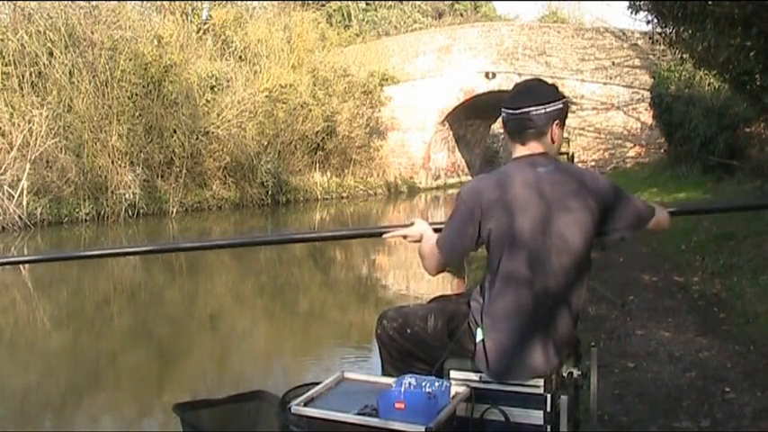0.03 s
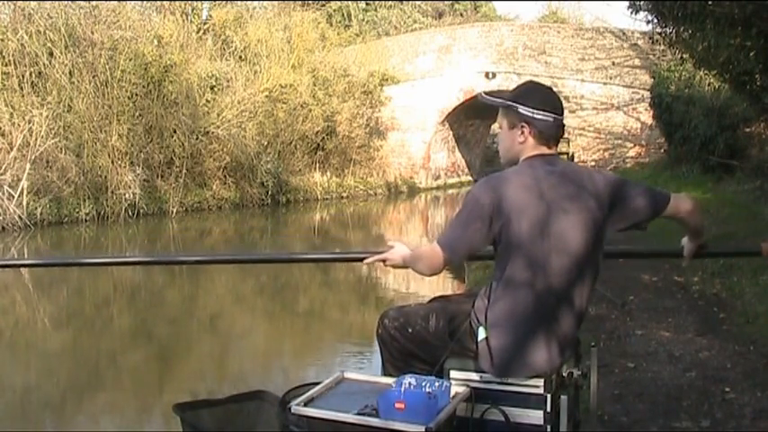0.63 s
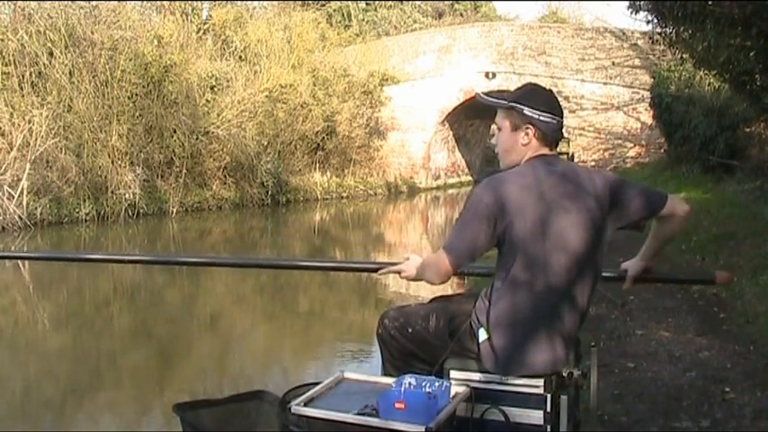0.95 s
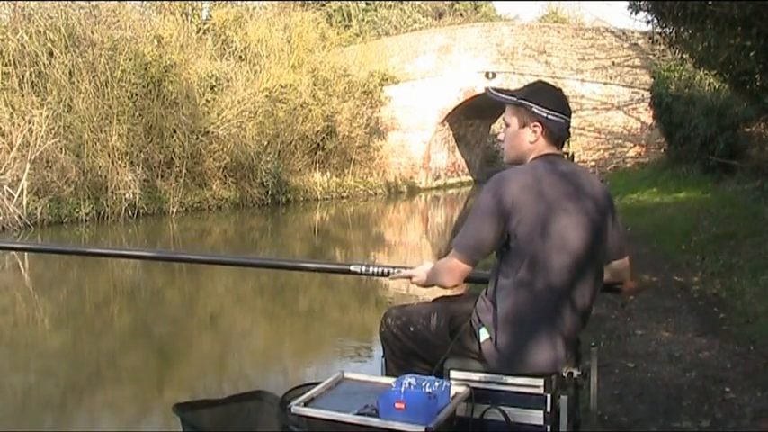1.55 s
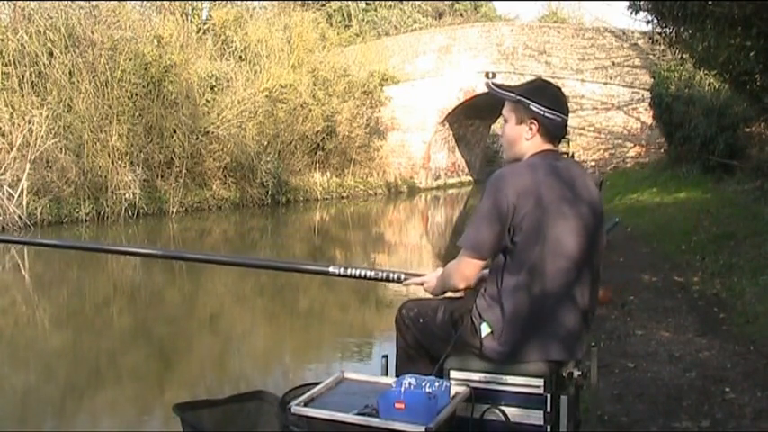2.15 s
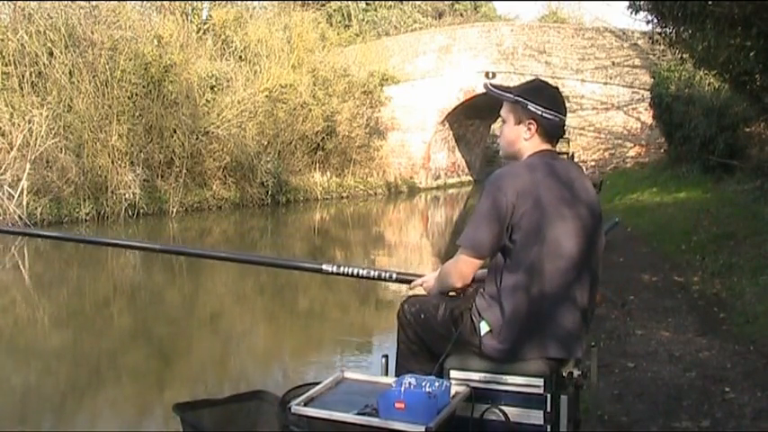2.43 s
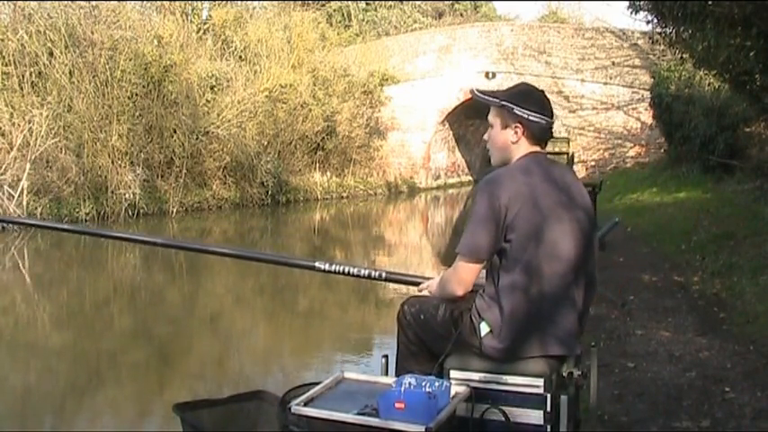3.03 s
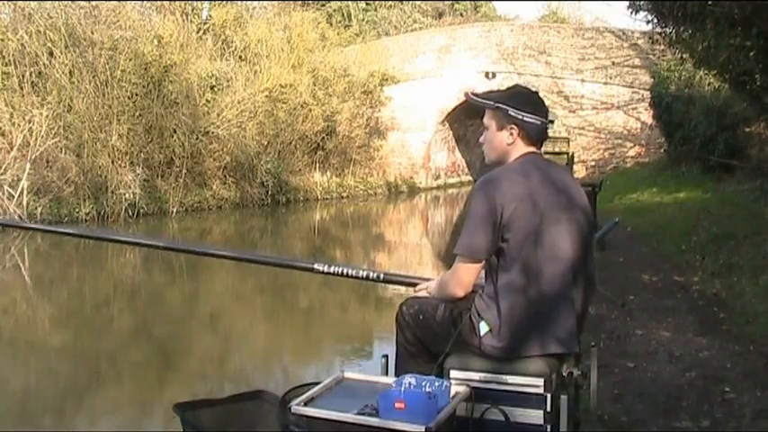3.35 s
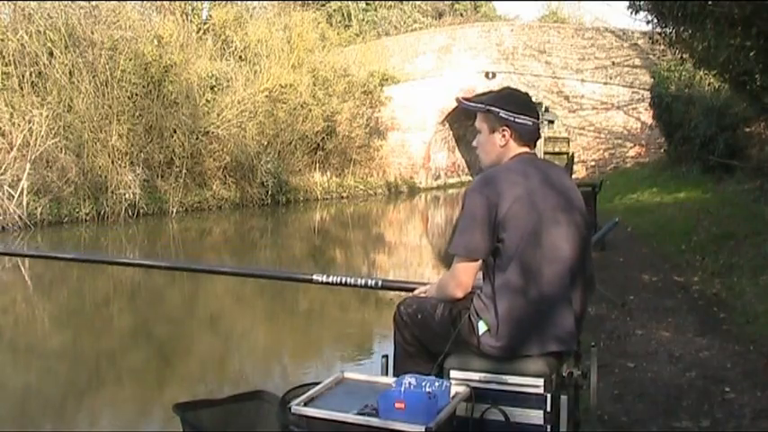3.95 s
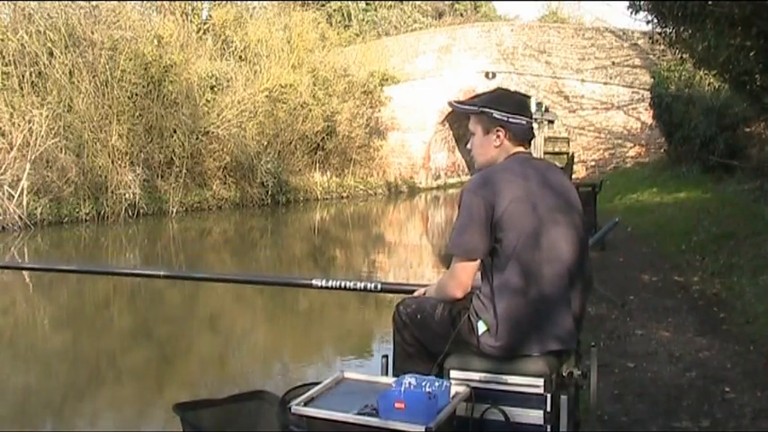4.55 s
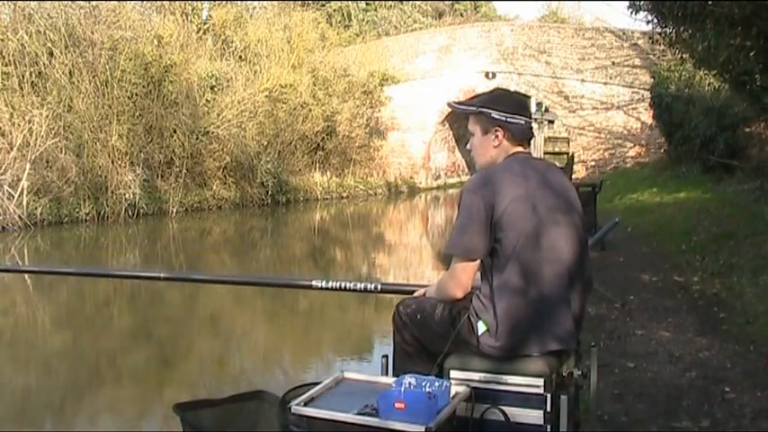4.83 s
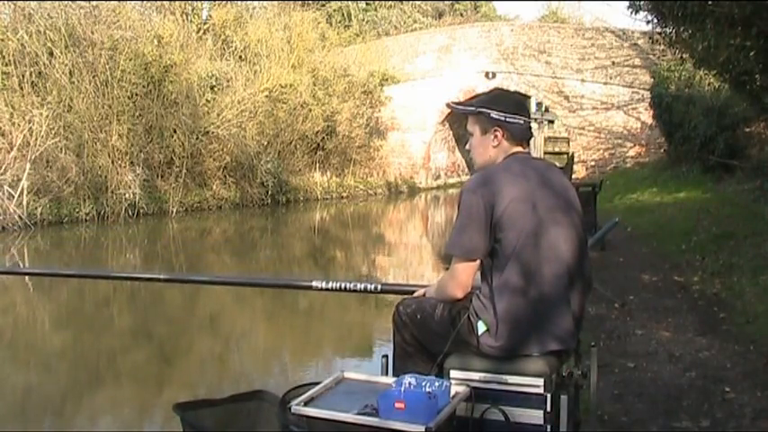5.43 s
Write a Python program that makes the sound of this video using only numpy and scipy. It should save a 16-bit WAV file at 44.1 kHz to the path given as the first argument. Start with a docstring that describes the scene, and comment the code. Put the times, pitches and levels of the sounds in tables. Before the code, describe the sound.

On a quiet canal bank, skin rubs along a hollow fishing pole near the microphone, making a bright, dry hiss in overlapping pulls with some gentle bumps. As the strokes fade, short whistles and chirps from a small bird come through with a slight echo. A few little bubbles plop and tackle clicks faintly. A far engine hums throughout under a light breeze, which swells briefly near the end.

```python
"""A few hissing strokes, then near quiet: an angler on a canal bank slides a long carbon pole back
through his hands and sits still. Skin friction makes the hiss and rings the hollow tube.
The pole knocks softly, tackle ticks, bubbles plop; a small songbird whistles in the bushes,
echoed by the bank. A far engine hums under the low rumble of the open air."""
import sys
import numpy as np
from scipy import signal
from scipy.fft import rfft, irfft
from scipy.io import wavfile
from scipy.ndimage import uniform_filter1d, map_coordinates

SR = 44100
rng = np.random.default_rng(int(sys.argv[2]) if len(sys.argv) > 2 else 0)


def unload_wav(signal):
    """Save mono or channel-first audio to the path in sys.argv[1] as 16-bit WAV at rate SR, clipped to [-1, 1]."""
    wavfile.write(
        sys.argv[1],
        SR,
        np.round(np.clip(np.atleast_2d(signal).T, -1, 1) * 32767).astype(np.int16),
    )


N = 251370
T = np.arange(N) / SR
BIN_HZ = np.arange(N // 2 + 1) * SR / N
AIR_LEFT_DB = 3.5

# friction spectra of the grips, shared by the strokes: f/Hz, level/dB
FAST_PULL = [(500, -34), (850, -29), (1060, -24), (1370, -19), (1870, -21), (2010, -19.5), (2170, -22.5),
             (2570, -21), (3440, -17), (6390, -11), (9310, 3), (11200, -1), (13200, -8), (14800, -9.5),
             (15500, -12)]
REACH = [(650, -45), (1100, -17.5), (1300, -26.5), (1500, -17), (1750, -23.5), (3220, -12.5), (4150, -15),
         (9520, 8), (11100, 7), (12300, -1.5), (13400, -0.5), (15500, -8)]
LONG_PULL = [(650, -47.5), (1100, -19), (1690, -17.5), (2090, -14.5), (2850, -13), (4340, -14.5),
             (5180, -11), (7140, -4.5), (8720, 2), (10800, 1.5), (11600, -6), (13400, -6), (15500, -15.5)]
SLOW_PULL = [(650, -19), (1100, 4), (1390, -13), (1530, 3), (1710, 4), (1960, 2.5), (2500, 2), (2980, 0.5),
             (3480, 0), (4150, -7), (5920, -6), (7220, -6), (8810, -3), (10600, -5), (15500, -18)]
LAST_PULL = [(590, -29), (1000, -4), (1080, -4), (1330, -9), (1460, -2.5), (2010, 1.5), (2340, -3.5),
             (3010, -8.5), (3410, -6), (3700, -11), (4340, -7.5), (5720, -10), (9040, 3), (12000, -4),
             (15500, -12)]


def undb(db):
    """Decibels to gain."""
    return 10 ** (np.asarray(db) / 20)


def unit(x):
    """Scale to rms 1."""
    return x / np.sqrt(np.mean(x ** 2) + 1e-20)


def curves(table):
    """Table columns, linearly interpolated in time."""
    times_s, *columns = np.transpose(table)
    return [np.interp(T, times_s, column) for column in columns]


def pan(left_db):
    """Stereo gains for a left-minus-right level."""
    return undb(np.array([[0.5], [-0.5]]) * left_db)


def butter(x, hz, kind, order=2):
    """Butterworth filter."""
    sos = signal.butter(order, hz, kind, fs=SR, output="sos")
    denormal_guard = 1e-12 * np.sin(np.arange(np.shape(x)[-1]))
    return signal.sosfilt(sos, x + denormal_guard)


def colour(x, points):
    """Filter by (f/Hz, gain/dB) points."""
    hz, db = np.transpose(points)
    return irfft(rfft(x) * undb(np.interp(np.log(BIN_HZ + 1), np.log(hz), db)), N)


def spread(mid, side, wide_hz):
    """Stereo pair: alike in the bass, unrelated above wide_hz."""
    side = irfft(rfft(side) * np.sqrt(BIN_HZ / (BIN_HZ + wide_hz)), N)
    return np.array([mid + side, mid - side])


def walk(rate_hz):
    """Smoothed random steps, rms 1."""
    hold = int(SR / rate_hz)
    steps = np.repeat(rng.standard_normal(N // hold + 1), hold)
    return unit(uniform_filter1d(uniform_filter1d(steps, hold), hold)[:N])


def add(out, x, start_s):
    """Mix x into out at start_s."""
    i = int(start_s * SR)
    out[i:i + len(x)] += x[:N - i]


def ramps(t, length_s, attack_s, release_s):
    """Trapezoid envelope."""
    return np.clip(np.minimum(t / attack_s, (length_s - t) / release_s), 0, 1)


def decay(t, t60_s):
    """Exponential fall, 60 dB per t60_s."""
    return np.exp(-np.log(1000) * t / t60_s)


def glide(length_s, first_hz, last_hz, arch_hz=0):
    """Linear pitch sweep plus a parabolic arch."""
    u = np.linspace(0, 1, int(length_s * SR))
    return first_hz + (last_hz - first_hz) * u + arch_hz * (1 - (2 * u - 1) ** 2)


def tone(hz, fade_s, waver):
    """Sine along a pitch curve, with jitter and soft ends."""
    t = np.arange(len(hz)) / SR
    jitter = np.interp(t, T[::64], rng.standard_normal(len(T[::64])))
    fade = np.sin(ramps(t, t[-1], fade_s, fade_s) * np.pi / 2) ** 2
    return np.sqrt(2) * fade * np.sin(2 * np.pi * np.cumsum(hz * (1 + waver * jitter)) / SR)


def delay(x, lag_s):
    """Time-varying delay."""
    return map_coordinates(x, [np.arange(N) - lag_s * SR], order=3, mode="nearest")


def bank_echoes(x, t60_s, build_s):
    """Diffuse echoes off bushes, bank and bridge, different at each ear."""
    t = T[:SR]
    response = rng.standard_normal((2, SR)) * (1 - np.exp(-t / build_s)) * decay(t, t60_s)
    response /= np.sqrt(np.sum(response ** 2, axis=1, keepdims=True))
    return signal.fftconvolve(x[None], response, axes=1)[:, :N]


def open_air(rumble_hz=66, eddy_db=1.4, gust_s=5.43, gust_width_s=0.25, gust_db=8):
    """A breeze rumbles and buffets, with one gust; above it, far traffic and a thin even hiss."""
    # ambient spectrum: f/Hz, density/dB
    air_spectrum = [(15, 0), (30, 4.5), (55, -0.5), (100, -8), (140, -10.5), (250, -15), (400, -18.5),
                    (600, -18.5), (920, -19.5), (1300, -25), (1900, -33.5), (5500, -39), (9000, -36),
                    (15500, -42.5)]
    # far traffic: t/s, level/dB
    traffic_levels = [(0, 0.5), (1.5, 1), (2.8, 1.5), (3.8, 0), (4.4, 0), (5.7, -1)]
    traffic_db, = curves(traffic_levels)
    eddies = undb(eddy_db * walk(5.95))
    gust = undb(gust_db * np.exp(-((T - gust_s) / gust_width_s) ** 2 / 2))
    noise = spread(*rng.standard_normal((2, N)), wide_hz=2350)
    air = unit(colour(noise, air_spectrum)) * undb(-45.5)
    rumble = butter(air, rumble_hz, "low", order=4) * undb(-1)
    upper = butter(air, rumble_hz, "high", order=4)
    traffic = butter(upper, 1610, "low", order=4) * undb(traffic_db + walk(9))
    hiss = butter(upper, 2130, "high", order=4)
    buffet = unit(butter(rng.standard_normal(N), [130, 300], "band")) * undb(-65)
    return ((rumble + buffet) * eddies * gust + traffic + hiss) * pan(AIR_LEFT_DB)


def far_engines(throb_db=0.5):
    """Only the lowest notes of distant engines carry this far; they waver on the way."""
    # main engine: t/s, firing rate/Hz, level/dB
    engine = [(0.0, 76.5, -50), (0.53, 79.2, -46), (0.65, 75.5, -61), (0.98, 79.25, -50.5),
              (1.82, 78.4, -47.5), (1.95, 81.4, -60), (2.17, 79.9, -51.5), (2.73, 80.2, -45),
              (2.98, 81.3, -43), (3.52, 81.7, -50.5), (5.6, 81.43, -47.5)]
    # other drones: start/s, length/s, first f/Hz, last f/Hz, fade/s, level/dB
    drones = [(0.0, 5.7, 27, 26.91, 0.031, -51), (1.15, 0.98, 153, 145.6, 0.17, -58.5),
              (3.7, 1.77, 173.9, 173.2, 0.69, -56.5)]
    firing_hz, engine_db = curves(engine)
    hum = np.sqrt(2) * undb(engine_db - 1) * np.sin(2 * np.pi * np.cumsum(firing_hz) / SR)
    for start_s, length_s, first_hz, last_hz, fade_s, db in drones:
        hz = glide(length_s, first_hz, last_hz)
        add(hum, undb(db) * tone(hz, fade_s, waver=0.02), start_s)
    return hum * undb(throb_db * walk(4.4)) * pan(AIR_LEFT_DB)


def songbird(flutter_db=2, scatter_hz=(3400, 5800)):
    """Pure gliding whistles from the left, smeared by twigs and echoed by the bank."""
    # whistles: start/s, length/s, first f/Hz, last f/Hz, arch/Hz, level/dB
    notes = [(3.351, 0.016, 4680, 3900, 0, -54), (3.395, .012, 3800, 3120, 0, -50.5),
             (3.430, .018, 4300, 3240, 0, -53), (3.485, .015, 4150, 3220, 0, -48),
             (3.542, 0.068, 4534, 4490, -3, -55.5), (3.655, .035, 4525, 4500, 0, -62.5),
             (3.708, 0.066, 4477, 4540, -66, -60), (3.842, 0.075, 7605, 8000, 40, -60),
             (3.922, 0.14, 8080, 8030, -76.5, -49), (4.091, 0.17, 8040, 8340, 28, -54.5),
             (4.251, 0.18, 4300, 4190, 6, -71), (4.34, 0.03, 3430, 4140, -80, -46),
             (4.376, .034, 4680, 4400, 55, -53.5), (4.410, 0.013, 4680, 4000, 100, -53.5),
             (4.423, 0.013, 3700, 3050, 0, -41.5), (4.442, 0.031, 2885, 3530, -1, -45),
             (4.487, 0.025, 3070, 2720, -330, -51), (4.57, .010, 4830, 3820, -150, -45.5),
             (4.575, 0.016, 4880, 4800, 48, -50), (4.607, 0.011, 4040, 3040, -4.5, -42.5),
             (4.676, 0.022, 3620, 3900, 948, -50), (4.699, 0.022, 3500, 3220, -62, -38.5),
             (4.727, 0.024, 3254, 3490, -50, -38.5), (4.754, 0.019, 3590, 3760, 0, -52),
             (4.776, .019, 3620, 2610, -150, -49), (4.851, 0.037, 2730, 2470, -30, -60),
             (4.899, .115, 2225, 2270, 22, -59.5), (5.032, .052, 2270, 2210, 0, -60.5),
             (5.132, 0.029, 4130, 3916, 20, -48), (5.152, .030, 3820, 3060, -380, -49),
             (5.2, 0.05, 3230, 2690, -77, -46.5), (5.338, 0.068, 3480, 3300, 9, -59),
             (5.342, .095, 2980, 2623, -34, -61), (5.257, .100, 8220, 8100, 0, -77),
             (5.522, .180, 8000, 7900, -1, -72), (5.665, .050, 4120, 4130, 0, -71)]
    song = np.zeros(N)
    for start_s, length_s, first_hz, last_hz, arch_hz, db in notes:
        hz = glide(length_s, first_hz, last_hz, arch_hz)
        add(song, undb(db) * tone(hz, fade_s=0.0011, waver=0.008), start_s)
    song *= undb(flutter_db * walk(70))
    # foliage scatters leaf-sized waves best and absorbs the shortest
    scattered = butter(song, scatter_hz, "band", order=1)
    twigs = undb(2.5) * bank_echoes(scattered, t60_s=0.18, build_s=0.0026)
    bank = undb(-2) * bank_echoes(scattered, t60_s=0.57, build_s=0.017)
    return undb(-1) * song * pan(9) + (twigs + bank) * pan(5.3)


def plops(rise_per_s=3.9):
    """Small bubbles ring briefly, rising in pitch as they reach the surface."""
    # plops and drips: t/s, level/dB, f/Hz, t60/s
    bubbles = [(2.059, -32.5, 580, 0.021), (3.604, -40, 566, 0.039), (4.145, -53, 1840, 0.027),
               (4.267, -43, 1280, .02), (4.664, -48, 1580, 0.023), (5.102, -48, 1780, 0.022)]
    out, t = np.zeros(N), T[:SR // 8]
    for start_s, db, hz, t60_s in bubbles:
        envelope = (1 - np.exp(-t * hz)) * decay(t, t60_s)
        phase = 2 * np.pi * hz * t * (1 + rise_per_s * t / 2)
        add(out, undb(db) * envelope * np.sin(phase), start_s)
    return out


def taps(contacts, width, rattle):
    """Each contact: an impulse and a short rattle through one resonance."""
    out, t = np.zeros(N), T[:SR // 5]
    for start_s, db, hz, t60_s in contacts:
        force = rattle * rng.standard_normal(len(t)) * decay(t, t60_s)
        force[0] += 1
        ring = butter(force, [hz / (1 + width), hz * (1 + width)], "band", order=1)
        add(out, undb(db) * ring / np.abs(ring).max(), start_s)
    return out


def handling():
    """Dull pole knocks, bright tackle ticks and plops close by, with short echoes."""
    # pole contacts: t/s, level/dB, f/Hz, rattle t60/s
    pole_knocks = [(.529, -35.5, 130, 0.11), (.554, -36, 150, 0.044), (.565, -36, 114, 0.065),
                   (.751, -31.5, 696, 0.026), (.912, -27.5, 351, .025), (.944, -31.5, 280, 0.028),
                   (1.037, -33, 292, .04), (2.092, -28, 560, .015)]
    # tackle contacts: t/s, level/dB, f/Hz, rattle t60/s
    tackle_ticks = [(3.645, -48, 2200, 0.018), (4.268, -48, 6500, .012), (4.754, -47, 2300, 0.011),
                    (4.848, -51.5, 7000, 0.0083), (4.883, -45, 7530, 0.0093), (4.892, -40.5, 6510, .01),
                    (5.058, -44, 9870, .012), (5.084, -46, 4460, 0.011), (5.093, -38, 4370, .006),
                    (5.099, -34.5, 9900, .01), (5.103, -42, 4460, .012), (5.117, -43, 9000, .006),
                    (5.129, -36.5, 6800, 0.016), (5.146, -35, 10100, 0.0059), (5.670, -51, 2400, .008)]
    knocks = butter(taps(pole_knocks, width=0.64, rattle=0.043), 2000, "low")
    ticks = taps(tackle_ticks, width=0.1, rattle=0.15)
    direct = knocks + ticks + plops()
    return direct * pan(9.9) + undb(-3.5) * bank_echoes(direct, t60_s=0.061, build_s=0.0015)


def palm_rub(half_band_hz=190):
    """Palm and sleeve rub the pole: dull noise bands that swell and fade."""
    # rubs: start/s, length/s, level/dB, centre f/Hz
    rubs = [(0.0, 0.27, -55, 847), (0.243, 0.51, -57.5, 478.5), (.78, 0.32, -59, 379),
            (1.352, 0.66, -53, 440.5), (2.458, 1.44, -58.5, 703.5)]
    noise = rng.standard_normal((2, N)) + 1j * rng.standard_normal((2, N))
    baseband = butter(noise, half_band_hz, "low")
    out = np.zeros((2, N))
    for start_s, length_s, db, hz in rubs:
        swell = np.sin(np.pi * np.clip((T - start_s) / length_s, 0, 1))
        band = unit(np.real(baseband * np.exp(2j * np.pi * hz * T)))
        out += undb(db - 1) * swell * band
    return spread(*out, wide_hz=2500) * pan(6.5)


def body_echoes(pair, side_db=-15, arm_db=-16, arm_lag_s=0.001094, sound_cm_per_s=34300):
    """Echoes off the angler's side and moving arms cut shifting notches into the hiss."""
    # side echo: t/s, extra path/cm
    side_path = [(0, 13.2), (.5, 11.9), (.9, 11.4), (1.3, 12.2), (1.7, 12.2), (2.2, 11.3), (3.0, 12),
                 (3.7, 12.8)]
    path_cm, = curves(side_path)
    left, right = pair
    left = left + undb(side_db) * delay(left, path_cm / sound_cm_per_s)
    return np.array([x + undb(arm_db) * delay(x, arm_lag_s * (1 + 0.13 * walk(2)))
                     for x in (left, right)])


def body_shadow(pair):
    """The angler's body shades one side or the other, band by band."""
    # shading: f/Hz, left minus right/dB
    shade = [(1000, 1.5), (2000, 0.5), (2900, -2), (3600, -2), (4600, -1.5), (6000, -3), (7500, -3),
             (9400, -9), (11500, -3), (15000, -4)]
    return np.array([colour(x, np.array(shade) * [1, share]) for x, share in zip(pair, (0.5, -0.5))])


def band_rms(pair, low_hz, high_hz):
    """Rms of the mid signal within a band."""
    power = 2 * np.abs(rfft(pair.mean(0)) / N) ** 2
    return np.sqrt(power[(BIN_HZ > low_hz) & (BIN_HZ < high_hz)].sum())


def pole_slide(grain_db=0.5, judder_db=0.5, drift_db=0.59, tube_exponent=0.73, split_hz=5000):
    """Skin catches and slips on the pole; each grip colours the hiss, the hollow tube rings below."""
    # overlapping strokes: start/s, length/s, attack/s, release/s, speed-up/(dB/s),
    # hiss/dB, tube ring/dB, left minus right/dB, grip spectrum
    strokes = [(-.05, 0.3394, 0.045, 0.037, 32, -27, -49.5, 7, FAST_PULL),
               (0.244, 0.21, 0.068, 0.1, 11, -23.5, -43, 5.5, FAST_PULL),
               (0.424, .84, .23, 0.088, 4.5, -31.5, -48.5, 9, REACH),
               (1.197, 0.43, 0.088, 0.11, -1, -32.5, -50, 8, LONG_PULL),
               (1.552, 0.33, 0.08, 0.1, 15, -32.5, -48.5, 8, LONG_PULL),
               (1.81, 0.48, 0.094, 0.12, -26, -41, -56, 9, LONG_PULL),
               (2.171, .49, 0.09, 0.19, 16, -46, -55, 10, LONG_PULL),
               (2.592, .55, .2, 0.28, -3, -40.5, -51, 8, SLOW_PULL),
               (3.028, 0.55, 0.14, 0.13, 24, -53, -51.5, 10, LAST_PULL),
               (3.54, 0.23, 0.067, .15, -10, -60, -65, 7, LAST_PULL)]
    catches = np.minimum(rng.standard_normal(N), 3)
    roughness = undb(grain_db * catches + judder_db * walk(300) + drift_db * walk(39.94))
    slips = rng.standard_normal((2, N)) * roughness
    friction = body_echoes(spread(*slips, wide_hz=200))
    hiss, tube = np.zeros((2, N)), np.zeros((2, N))
    for start_s, length_s, attack_s, release_s, db_per_s, hiss_db, tube_db, left_db, grip in strokes:
        t = np.clip(T - start_s, 0, length_s)
        speed = ramps(t, length_s, attack_s, release_s) * undb(db_per_s * (t - length_s / 2))
        rub = colour(friction, grip)
        hiss += speed * undb(hiss_db) * pan(left_db) * rub / band_rms(rub, 5500, 15000)
        tube += speed ** tube_exponent * undb(tube_db) * rub / band_rms(rub, 1500, 4500)
    hiss = butter(hiss, split_hz, "high", order=4)
    tube = butter(tube, split_hz, "low", order=4) * pan(2)
    return body_shadow(hiss + tube)


def scene():
    """Stereo mix at the towpath."""
    return pole_slide() + palm_rub() + handling() + songbird() + far_engines() + open_air()


def record(dry):
    """Steep low-pass on the top treble."""
    top_hz = 15850
    return signal.sosfilt(signal.ellip(12, 0.1, 90, top_hz, fs=SR, output="sos"), dry)


dry = scene()
out = record(dry)
unload_wav(out)
```